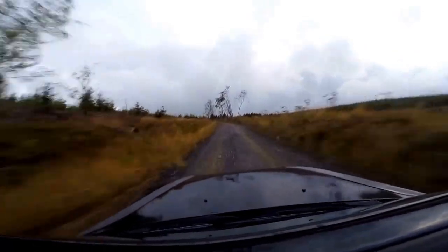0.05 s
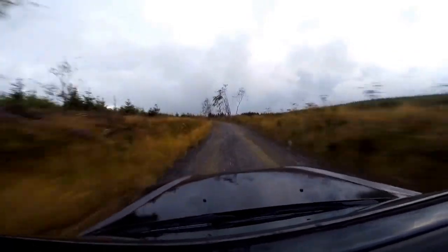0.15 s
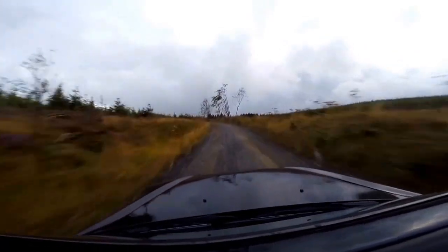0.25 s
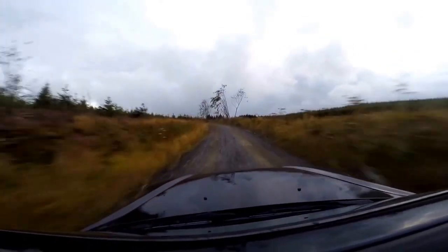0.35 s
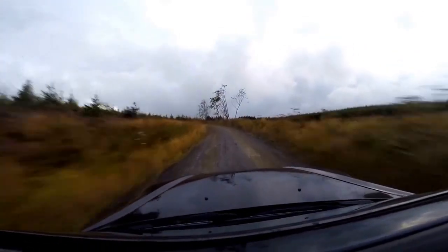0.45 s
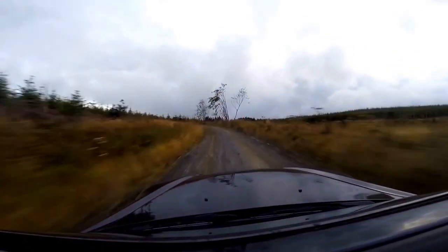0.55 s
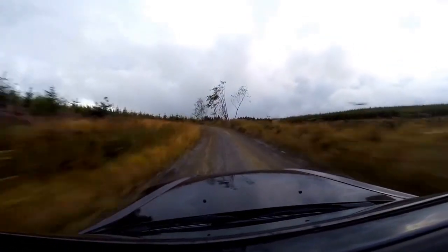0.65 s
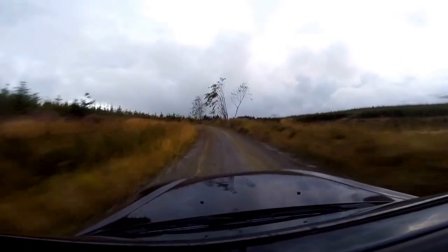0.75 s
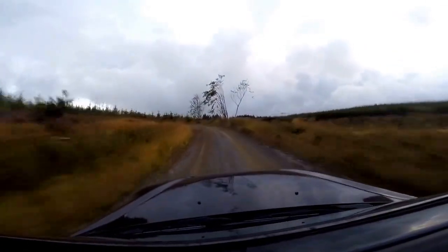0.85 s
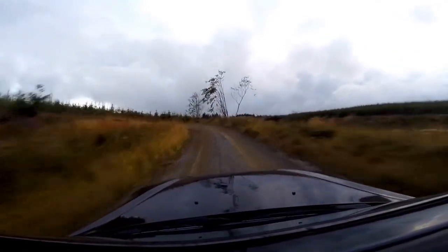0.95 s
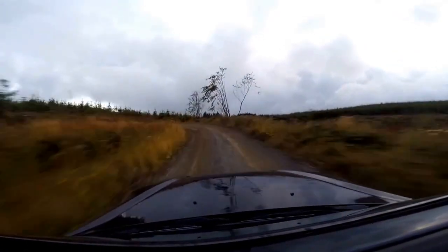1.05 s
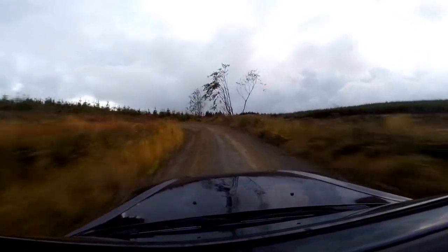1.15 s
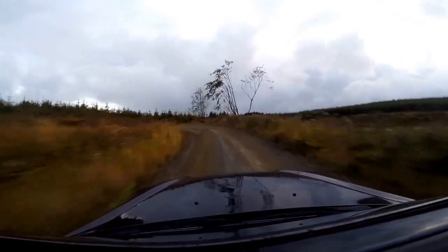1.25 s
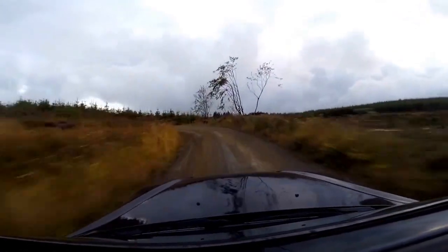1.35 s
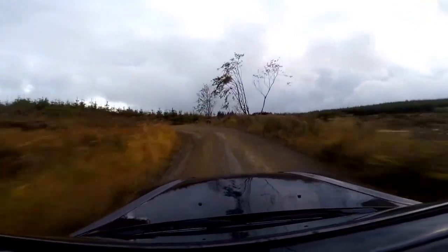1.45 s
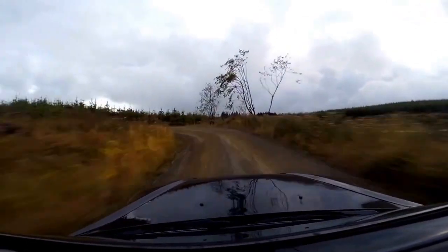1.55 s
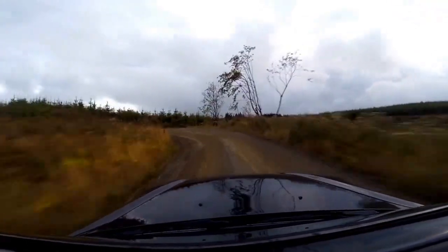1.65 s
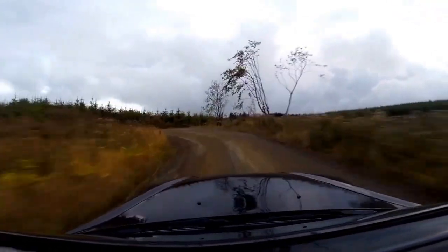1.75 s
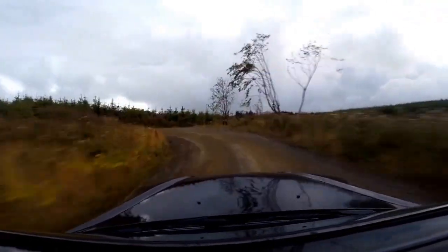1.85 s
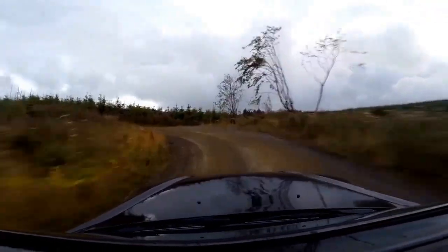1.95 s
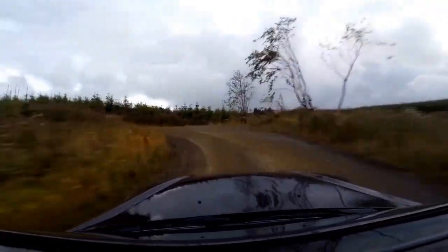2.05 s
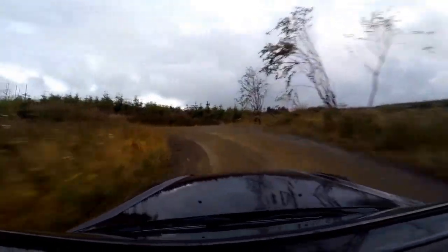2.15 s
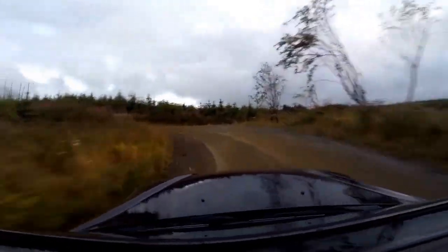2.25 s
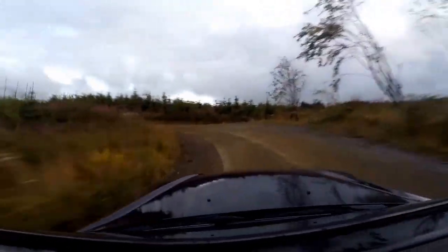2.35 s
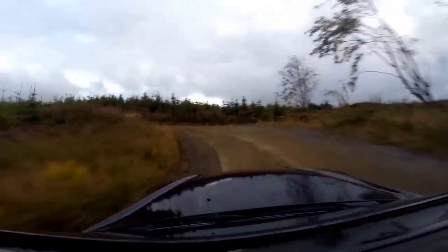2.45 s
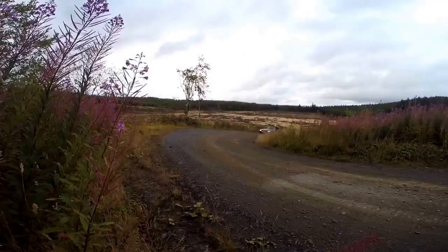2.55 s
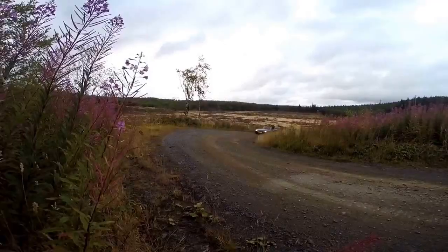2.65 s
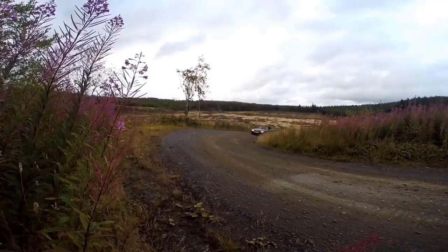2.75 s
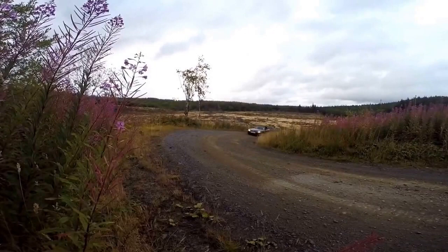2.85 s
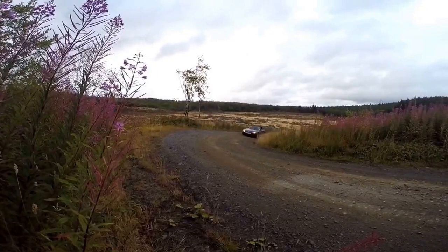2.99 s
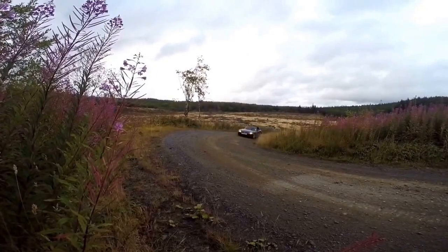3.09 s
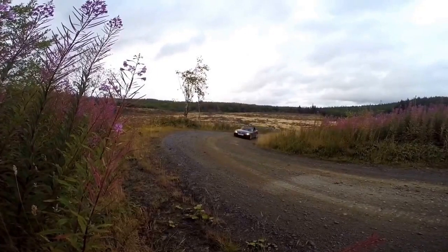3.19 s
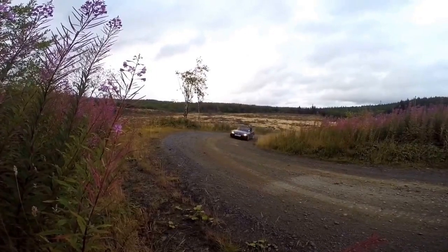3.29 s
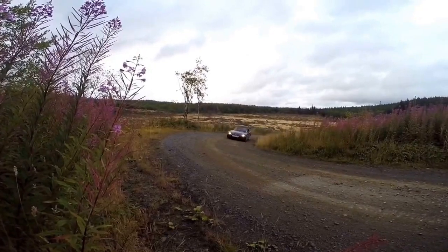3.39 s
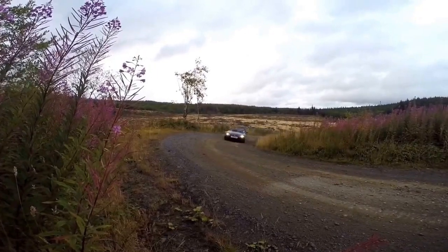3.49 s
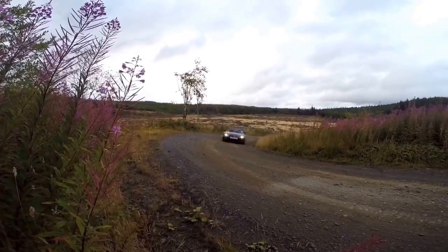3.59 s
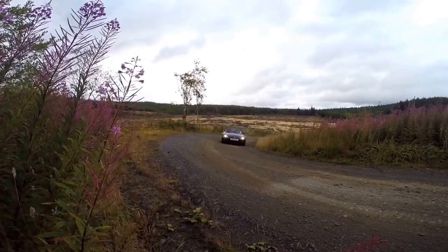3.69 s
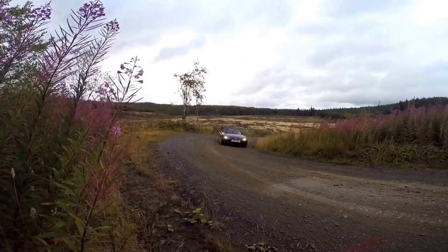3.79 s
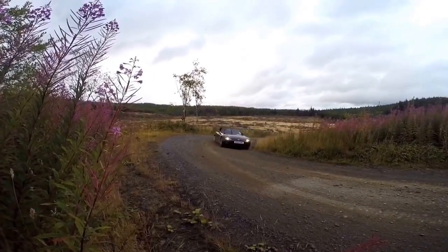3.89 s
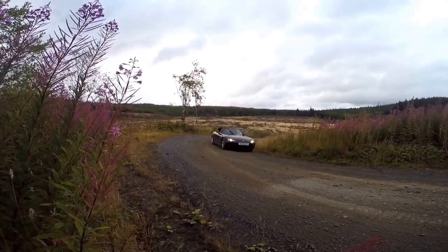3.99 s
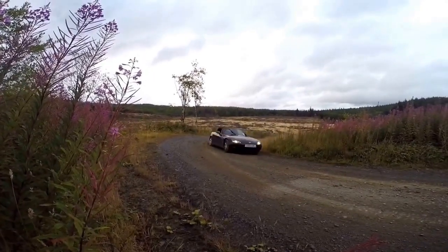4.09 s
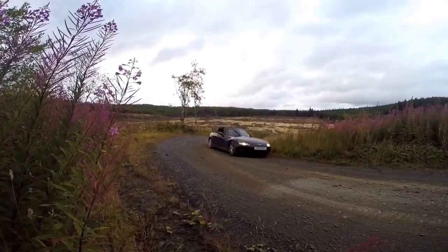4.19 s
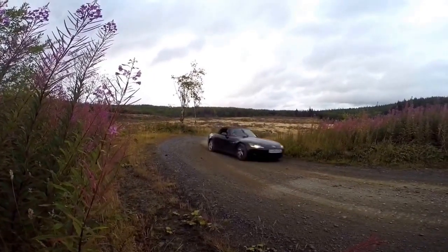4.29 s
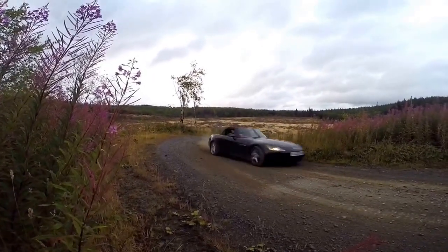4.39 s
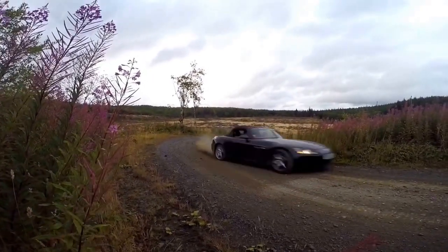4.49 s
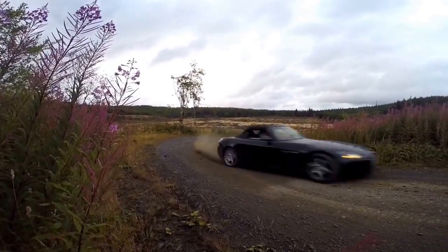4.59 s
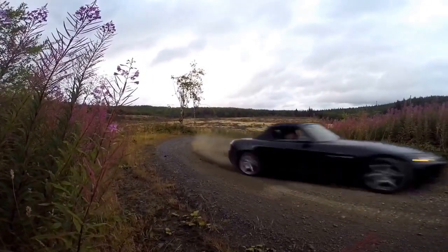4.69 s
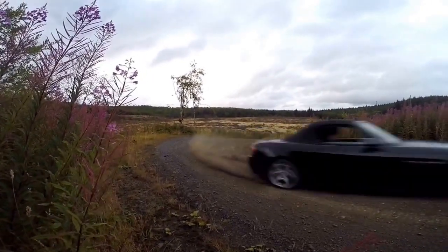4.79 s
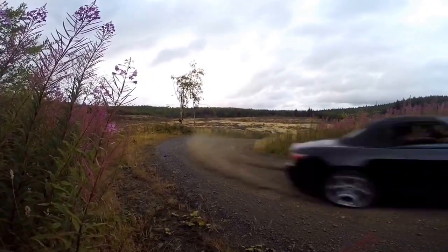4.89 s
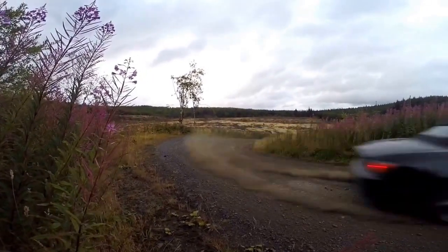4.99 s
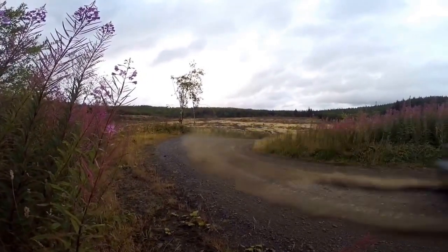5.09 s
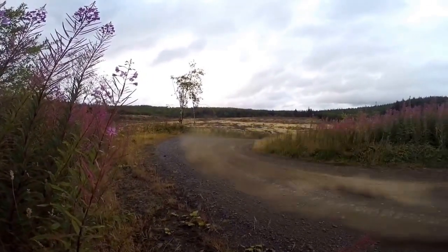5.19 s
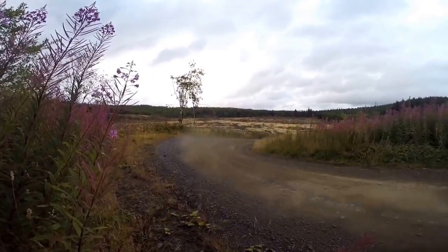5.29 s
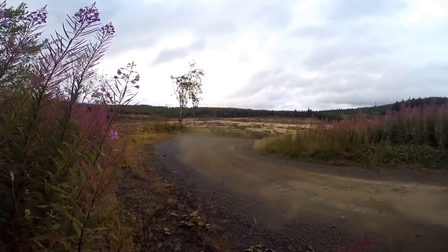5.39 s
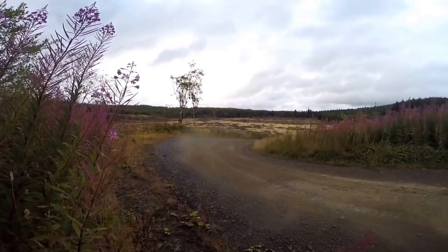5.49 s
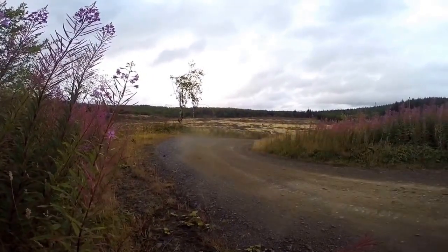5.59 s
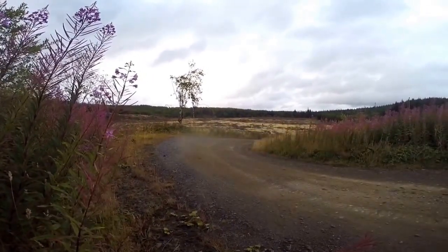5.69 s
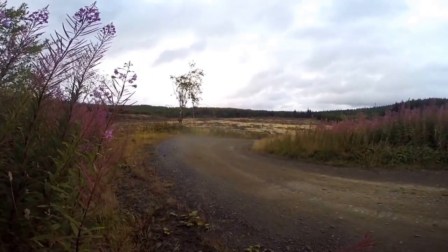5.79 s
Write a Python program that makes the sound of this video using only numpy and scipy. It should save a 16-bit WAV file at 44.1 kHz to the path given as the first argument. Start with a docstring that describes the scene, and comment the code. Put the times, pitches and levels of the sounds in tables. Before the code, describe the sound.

First, on board a moving car, gusty low wind thumps the microphone over road noise, with a few stones ticking on the body. This drops away quickly. Heard from the verge, the car's four-cylinder engine revs up, dips and climbs again as it comes round a gravel bend. The crunching tyres swell to a roar as it passes close, and the engine drones away amid scattering pebbles.

```python
"""Sports car on a gravel forest road

On board, wind buffets the microphone over road hiss, and stones tick on the bodywork. Then from
the verge: the four-cylinder engine pulls, lifts and pulls again as the car slides round a bend and
passes close by, its tyres roaring on the gravel and throwing stones behind it. The gravel is a
stream of tiny clicks, the exhaust a stack of wavering sines, each stone a scuff that rings modes."""
import sys
import numpy as np
from scipy import signal
from scipy.fft import rfft, irfft
from scipy.io import wavfile
from scipy.ndimage import uniform_filter1d

SR = 44100
rng = np.random.default_rng(int(sys.argv[2]) if len(sys.argv) > 2 else 0)


def wav_record(signal):
    """Record a signal, one row per channel, as 16-bit PCM in the file named by sys.argv[1]."""
    frames = np.transpose(np.atleast_2d(signal))
    bounded = np.clip(frames, -1, 1)
    # unit amplitude maps onto the largest positive 16-bit level
    quanta = np.round(bounded * 32767).astype(np.int16)
    wavfile.write(sys.argv[1], SR, quanta)


N = 257528
TIME = np.arange(N) / SR

# On-board tone curves: f/Hz, relative level/dB
FAST_WIND_EQ = [(11, -43), (18, -14.5), (53, 3), (113, -0.5), (203, -3.5), (474, -16), (600, -28),
                (780, -30), (1320, -120)]  # wind on the straight
SLOW_WIND_EQ = [(11, -29), (18, -2), (87, -0.5), (284, -18), (339, -18), (410, -37), (600, -41), (780, -53),
                (1320, -120)]  # deeper wind, once slowed for the bend
ROAD_EQ = [(240, -36), (400, -6), (475, -12), (570, -6), (1030, -12.5), (1320, -21.5), (3220, -30.5),
           (4500, -42), (5850, -69), (9900, -120)]  # midrange road rush
GRIT_EQ = [(2350, -30.5), (4000, -19.5), (4550, -8), (5100, -4.5), (5520, -5), (6430, -0.5), (7400, -5),
           (8190, -11), (9650, -17), (11500, -22.5), (13700, -26.5), (15400, -41)]  # fine grit hiss
# Eddies slapping the microphone: t/s, relative peak/dB
WIND_SLAPS = [(0.158, -2), (0.595, -13), (0.699, 1), (0.755, -5), (0.954, 1.5), (1.17, -3), (1.215, -4),
              (1.308, -6), (1.706, -4), (1.917, -5.5), (2.051, -0.5), (2.099, -4)]
# The wind drops away for a moment: t/s, length/s, depth/dB
WIND_LULLS = [(0.452, 0.042, 3.5), (0.88, 0.11, 2), (1.352, .055, 6), (1.46, 0.11, 3.5),
              (1.682, 0.044, 7.5), (1.886, 0.044, 2), (2.288, 0.057, 3)]
# Stones on the bodywork: t/s, relative peak/dB
PANEL_HITS = [(0.593, -36), (2.1033, -38), (2.179, -38), (2.1824, -35), (2.2524, -49), (2.26, -32.5),
              (2.278, -42), (2.3304, -13.5)]
# Modes of the struck panel: f/Hz, relative level/dB, t60/s
PANEL_MODES = [(1790, -20, .008), (2520, -6, .004), (3340, -29, 0.0037), (4750, -7, 0.0084),
               (5560, -1, 0.011), (6960, -10, 0.0047), (7950, -21, 0.0038), (8600, -4.5, 0.0075),
               (10100, -8.5, 0.0024), (12800, -20, 0.0037)]
# Engine speed heard from the verge: t/s, firing rate/Hz
REVS = [(2.6, 101.7), (2.73, 101.1), (2.86, 123.6), (3.0, 132.9), (3.3, 143.2), (3.49, 136.2), (3.63, 125),
        (3.73, 108.1), (3.77, 106.3), (3.92, 126.7), (4.02, 134.9), (4.29, 149.0), (4.57, 157.6),
        (4.75, 157.8), (5.84, 140.6)]
# The throttle opens: start t/s, end t/s, boom level as if alongside/dB
THROTTLE_PULLS = [(2.79, 3.32, -12.5), (3.84, 4.203, -13), (4.13, 4.52, -11), (4.73, 4.801, -17.5),
                  (5.149, 5.999, -17)]
# Exhaust partials; unequal cylinders give quarter orders:
# multiple of the firing rate, relative level coming/dB, relative level going/dB
EXHAUST_PARTIALS = [(.5, -20, -28), (1.75, -11, -32), (2, -16, -16), (2.25, -23, -32), (2.75, -19, -30),
                    (3, -15, -21), (3.25, -25, -30), (4, -24, -26), (4.25, -14, -26), (4.75, -19, -26),
                    (6, -24, -14), (6.25, -25, -22), (6.5, -26, -22), (7, -25, -27), (8, -26, -30),
                    (9, -36, -32)]
# Tone curves of the tyre layers, low to high: f/Hz, relative level/dB
RUMBLE_EQ = [(13, -45), (22, -34), (40, -6.5), (86, -5.5), (108, 0), (128, -12), (156, -9), (200, -10),
             (260, -15.5), (440, -120)]
CHURN_EQ = [(110, -27), (180, -12.5), (216, -14.5), (259, -0.5), (344, -4.5), (620, -7), (810, -17),
            (1360, -120)]
ROAR_EQ = [(290, -15), (500, -9), (580, -8), (680, -3), (958, 0.5), (1130, -5.5), (1300, -12.5),
           (1700, -24.5), (2210, -35), (3740, -120)]
CRUNCH_EQ = [(850, -38), (1450, -6), (1580, -5.5), (2310, -7), (2780, -12.5), (3170, -11), (3880, -19),
             (4200, -26), (5460, -56), (9240, -120)]
SPRAY_EQ = [(2240, -7), (3800, -22), (4030, -2), (4370, 1.5), (5060, 0), (6220, -1), (7410, -9),
            (8830, -10.5), (13100, -19.5), (14800, -21), (15400, -44)]
# Their pass-bys: level alongside before trim/dB, loss per doubling of distance coming/dB, going/dB
RUMBLE_PASS_BY = (-22, 4.2, 6.1)
CHURN_PASS_BY = (-14.5, 5.8, 9.7)
ROAR_PASS_BY = (-12.5, 7.77, 7.4)
CRUNCH_PASS_BY = (-29.5, 5.07, 4.97)
SPRAY_PASS_BY = (-42.5, 5.9, 5.4)
# Thin tones of electronics: f/Hz, level/dB
WHINE_TONES = [(11719, -82), (14626, -87)]
# Thrown stones landing: t/s, relative peak/dB, ring f/Hz
LANDINGS = [(2.877, -38.5, 5490), (3.368, -39, 5330), (3.748, -35, 2100), (4.0265, -33, 5950),
            (4.1204, -27, 5230), (4.7305, -19.5, 5720), (4.8963, -27, 6080), (5.005, -33, 5470),
            (5.0358, -26, 6570), (5.21, -29, 5460), (5.2464, -28.5, 5450), (5.578, -24.5, 6220),
            (5.618, -22, 5655), (5.635, -29, 5070), (5.6673, -20.5, 4700), (5.7533, -26.5, 7840),
            (5.778, -30, 5280)]
# Modes of a pebble: multiple of the ring frequency, relative level/dB
PEBBLE_MODES = [(.55, 9.5), (.8, 3), (1, 10), (1.3, 1.5), (1.75, -2), (2.1, -4.5)]
# Showers of fine stones off the tyres: t/s, length/s, rise/dB
STONE_SHOWERS = [(3.38, .09, 2.5), (4.76, .15, 3), (5.69, 0.35, 6.5)]
# Puffs of wind rumble at the verge: t/s, length/s, rise/dB
WIND_PUFFS = [(3.59, 0.12, 4.5), (3.86, 0.12, 3.5), (5.03, .1, 4.5)]
# Sliding tyres bite into heaps of gravel: t/s, relative peak/dB
TYRE_BITES = [(4.192, 5), (4.286, 4.5), (4.326, 3.5), (4.443, -5), (4.584, -7), (4.617, -2.5), (4.799, 0),
              (4.84, 0.5), (4.945, 2), (5.055, 3), (5.161, -2), (5.258, -5), (5.772, -12)]


def from_db(db):
    """Decibels to gain."""
    return 10 ** (np.asarray(db) / 20)


def rms_one(x):
    """Scale to rms 1."""
    return x / np.sqrt(np.mean(x ** 2) + 1e-20)


def crossover(at_s, width_s):
    """A smooth move from 0 to 1, centred on a moment."""
    return .5 + .5 * np.tanh((TIME - at_s) / width_s)


def swell(at_s, length_s):
    """A smooth rise to 1 and back, centred on a moment."""
    return np.exp(-(2 * (TIME - at_s) / length_s) ** 2)


def swells(rows):
    """A fader ride in dB from a table of swells."""
    return sum(db * swell(at_s, length_s) for at_s, length_s, db in rows)


def drift(rate_hz):
    """A random wobble of rms 1, mostly slower than the rate."""
    hz = np.arange(N // 2 + 1) * SR / N
    return rms_one(irfft(rfft(rng.standard_normal(N)) * hz / (hz + 2) / (1 + (hz / rate_hz) ** 2), N))


def coloured(x, eq):
    """Shape a signal with a tone curve, rolling off steeply past its ends; rms 1."""
    hz, db = np.transpose(eq)
    log_hz = np.log(np.maximum(np.arange(N // 2 + 1) * SR / N, 1))
    outside = np.maximum(np.log(hz[0]) - log_hz, 0) + np.maximum(log_hz - np.log(hz[-1]), 0)
    gain = from_db(np.interp(log_hz, np.log(hz), db) - 60 * outside)
    return rms_one(irfft(rfft(x) * gain, N))


def steady(x, span_s):
    """Even out swells slower than the span, leaving the fine texture."""
    return x / np.sqrt(uniform_filter1d(x ** 2, int(span_s * SR)) + 1e-9)


def grains(per_s, spread_db, bed):
    """Random stone contacts, a few large and many small, on a bed of countless tiny ones."""
    sizes = from_db(spread_db * np.minimum(rng.exponential(1, N), 5)) * rng.choice([-1, 1], N)
    return rms_one(sizes * (rng.random(N) < per_s / SR)) + bed * rng.standard_normal(N)


def ring(force, hz, t60):
    """One damped mode, driven by a force."""
    radius, angle = from_db(-60 / (t60 * SR)), 2 * np.pi * hz / SR
    return signal.lfilter([0, np.sin(angle)], [1, -2 * radius * np.cos(angle), radius ** 2], force + 1e-18)


def scuff(decay_s):
    """The force of a rough contact: noise that dies quickly."""
    age = TIME[:SR // 10]
    return rng.standard_normal(len(age)) * np.exp(-age / decay_s)


def add(out, at_s, sound, peak_db):
    """Spot a short sound at a time with a given peak."""
    start = int(at_s * SR)
    out[start:start + len(sound)] += (from_db(peak_db) * sound / np.abs(sound).max())[:N - start]


def gust(at_s, rise_s=0.0096):
    """The gust behind a buffet: a fast attack to 1, then a slower release."""
    age = np.maximum(TIME - at_s, 0) / rise_s
    return age * np.exp(1 - age)


def airstream(wind_db=-11, road_db=-27, grit_db=-49):
    """Wind on the microphone, road rush and grit hiss, all shaken by the same eddies and gusts."""
    slowed = crossover(2.16, 0.047)  # the car slows for the bend
    gust_db = 2 * sum(gust(at_s) for at_s, _ in WIND_SLAPS) - swells(WIND_LULLS)
    splash_db = 9 * swell(2.19, .035)  # turning in throws gravel into a wheel arch
    eddies, air = drift(34), rng.standard_normal(N)
    wind = (1 - slowed) * coloured(air, FAST_WIND_EQ) + slowed * coloured(air, SLOW_WIND_EQ)
    wind = steady(wind * from_db(2.5 * eddies), span_s=0.075)
    road = coloured(grains(per_s=5000, spread_db=3.9, bed=1), ROAD_EQ)
    road = steady(road * from_db(1.5 * eddies), span_s=0.2)
    grit = coloured(grains(per_s=5000, spread_db=5.6, bed=1.8), GRIT_EQ)
    grit = rms_one(grit * from_db(1.9 * eddies))
    return (from_db(wind_db + gust_db) * wind
            + from_db(road_db + 1.1 * gust_db + .5 * splash_db + .5 * slowed) * road
            + from_db(grit_db + 0.79 * gust_db + splash_db) * grit)


def thuds(cues, band_hz, decay_s, trim_db):
    """Short dull bursts: eddies slapping the microphone, or tyres digging in."""
    out = np.zeros(N)
    dull = signal.butter(2, band_hz, "band", fs=SR, output="sos")
    for at_s, db in cues:
        add(out, at_s, signal.sosfilt(dull, signal.sosfilt(dull, scuff(decay_s))), db + trim_db)
    return out


def strike(modes, contact_s, dull_hz):
    """A rough contact rings each mode; a small stone radiates no lows, and its bluntness dulls the top."""
    sound = sum(from_db(db) * rms_one(ring(scuff(contact_s), hz, t60)) for hz, db, t60 in modes)
    lowest_hz = modes[0][0]
    return signal.sosfilt(signal.butter(2, [lowest_hz, dull_hz], "band", fs=SR, output="sos"), sound)


def body_hits(trim_db=8):
    """Stones flung by the front tyres crack against a panel."""
    out = np.zeros(N)
    for at_s, db in PANEL_HITS:
        add(out, at_s, strike(PANEL_MODES, contact_s=.0007, dull_hz=15000), db + trim_db)
    return out


def pass_by(alongside_db, coming_db, going_db, nearest_s=4.765, nearest_m=4.1, speed_m_per_s=15):
    """Level in dB of a sound riding with the car: it drops with each doubling of distance."""
    distance_m = np.hypot(nearest_m, speed_m_per_s * (TIME - nearest_s))
    return alongside_db - np.where(TIME < nearest_s, coming_db, going_db) * np.log2(distance_m / nearest_m)


def throttle(attack_s=0.087, release_s=0.11, overrun_db=-32):
    """Exhaust boom in dB: each pull swells, holds and dies back to the overrun."""
    pulls = [from_db(db) * np.clip(np.minimum((TIME - on) / attack_s, 1 - (TIME - off) / release_s), 0, 1)
             for on, off, db in THROTTLE_PULLS]
    approach = from_db(pass_by(0, coming_db=4, going_db=0))  # softer while the tailpipe points away
    return 20 * np.log10(np.hypot(np.max(pulls, axis=0) * approach, from_db(overrun_db)))


def exhaust(firings):
    """A boom at the firing rate, with wavering partials that shift as the tailpipe turns to the verge."""
    boom_db = throttle()
    going = crossover(5.21, 0.06)
    # alongside, the boom fades but the growl stays
    growl_db = np.maximum(boom_db - 1, pass_by(*ROAR_PASS_BY) - 16)
    out = from_db(boom_db + 1.7 * drift(43)) * np.sin(2 * np.pi * firings)
    for multiple, coming_db, going_db in EXHAUST_PARTIALS:
        level_db = growl_db + coming_db + going * (going_db - coming_db) + 2 * drift(8)
        out += from_db(level_db) * np.sin(2 * np.pi * multiple * firings + .25 * drift(10))
    return np.sqrt(2) * out


def clinks(count=36):
    """Many small flints knock together and ring briefly, at pitches spread over the treble."""
    pitches = np.geomspace(3900, 12500, count) * from_db(rng.normal(0, .15, count))
    gains = from_db(np.interp(pitches, *np.transpose(SPRAY_EQ)))
    return rms_one(sum(gain * ring(grains(per_s=40, spread_db=2.5, bed=0), hz, t60=0.018)
                       for hz, gain in zip(pitches, gains)))


def grassy_bank(crunch, spray, screen_db=-7, hollow_hz=3780, hollow_share=0.36):
    """Until the car leaves the bend, a bank screens the crunch and scoops a band out of the treble."""
    hidden = 1 - crossover(4.07, 0.065)
    gravel = from_db(screen_db * hidden) * crunch + spray
    band = signal.lfilter(*signal.iirpeak(hollow_hz, Q=5.1, fs=SR), gravel)
    return gravel - hollow_share * hidden * band


def tyres(firings):
    """Tyres judder through loose gravel, heaving at each bite; the engine's rasp throbs in their roar."""
    judder = from_db(0.5 * drift(28))
    heave_db = 2 * sum(from_db(db) * swell(at_s, 0.056) for at_s, db in TYRE_BITES)
    # one throb per firing, another per cycle of four
    rasp = 1 + .25 * np.cos(2 * np.pi * firings) + .28 * np.cos(2 * np.pi * firings / 4)
    grinding = grains(per_s=2500, spread_db=2.8, bed=.6) * judder
    rumble = steady(coloured(rng.standard_normal(N), RUMBLE_EQ), span_s=0.081)
    churn = steady(coloured(grinding, CHURN_EQ), span_s=0.22)
    roar = steady(coloured(grinding, ROAR_EQ) * rasp, span_s=.06)
    crunch = rms_one(coloured(grains(per_s=3500, spread_db=2.6, bed=.8), CRUNCH_EQ) * np.sqrt(judder))
    spray = coloured(grains(per_s=2500, spread_db=4.4, bed=1), SPRAY_EQ) + from_db(-1) * clinks()
    # each layer rides its own pass-by; the last number is its trim in dB
    rumble *= from_db(pass_by(*RUMBLE_PASS_BY) + swells(WIND_PUFFS) + 3.5)
    churn *= from_db(pass_by(*CHURN_PASS_BY) + heave_db - 2)
    roar *= from_db(pass_by(*ROAR_PASS_BY) + heave_db - .4)
    crunch *= from_db(pass_by(*CRUNCH_PASS_BY) + .3)
    spray *= from_db(pass_by(*SPRAY_PASS_BY) + swells(STONE_SHOWERS) - .5)
    return rumble + churn + roar + grassy_bank(crunch, spray)


def whine():
    """Faint electronics at the verge: thin steady tones, far under everything else."""
    return sum(np.sqrt(2) * from_db(db) * np.sin(2 * np.pi * hz * TIME) for hz, db in WHINE_TONES)


def thrown_stones(t60=0.0022, trim_db=0.5):
    """Thrown pebbles clack down on the road, each with its own pitch."""
    out = np.zeros(N)
    for at_s, db, hz in LANDINGS:
        modes = [(hz * ratio, mode_db, t60) for ratio, mode_db in PEBBLE_MODES]
        add(out, at_s, strike(modes, contact_s=0.0068, dull_hz=11500), db + trim_db)
    return out


def scene(cut_s=2.543, fade_out_s=0.089, fade_in_s=0.55):
    """The on-board ride fades out quickly, then the pass-by at the verge fades in."""
    firing_hz = np.interp(TIME, *np.transpose(REVS))
    firings = np.cumsum(firing_hz) / SR
    buffets = thuds(WIND_SLAPS, band_hz=(108, 970), decay_s=0.0072, trim_db=-9)
    bites = thuds(TYRE_BITES, band_hz=(347, 1160), decay_s=0.016, trim_db=-6.5)
    on_board = airstream() + buffets + body_hits()
    verge = exhaust(firings) + tyres(firings) + thrown_stones() + bites
    fade_out = np.clip((cut_s - TIME) / fade_out_s, 0, 1) ** 1.3
    fade_in = np.clip((TIME - cut_s) / fade_in_s, 0, 1) ** 0.51
    return (on_board * fade_out + verge * fade_in + whine() * (TIME > cut_s))[None]


def record(dry, ceiling=1.04, cutoff_hz=15200):
    """Soft clipping rounds the loudest peaks, and a steep low-pass takes off the top."""
    rounded = ceiling * np.tanh(dry / ceiling)
    return signal.sosfilt(signal.ellip(10, .1, 90, cutoff_hz, fs=SR, output="sos"), rounded)


dry = scene()
out = record(dry)
wav_record(out)
```